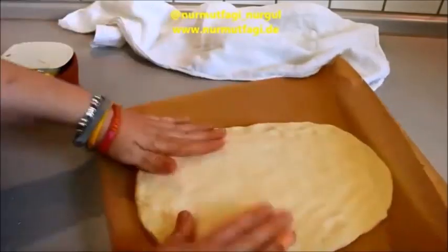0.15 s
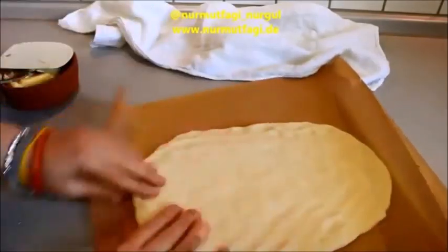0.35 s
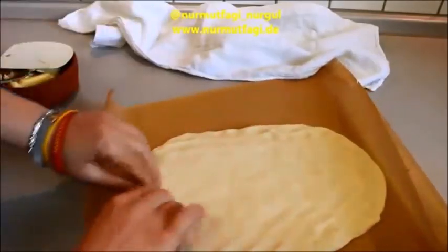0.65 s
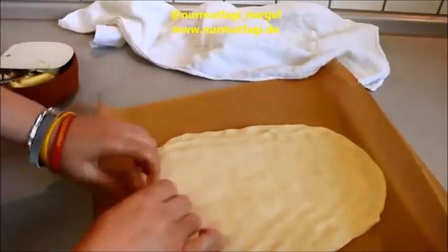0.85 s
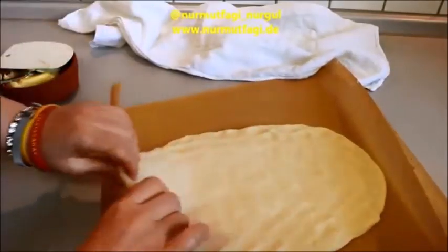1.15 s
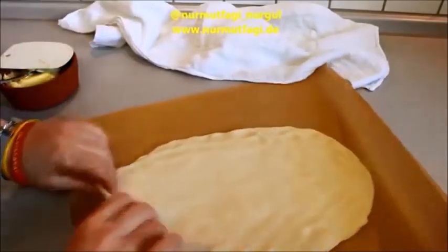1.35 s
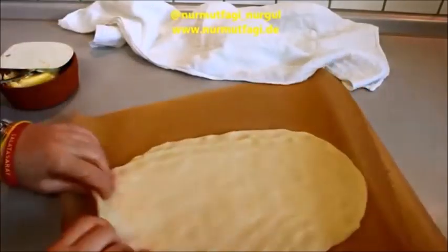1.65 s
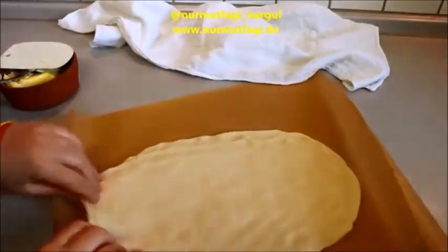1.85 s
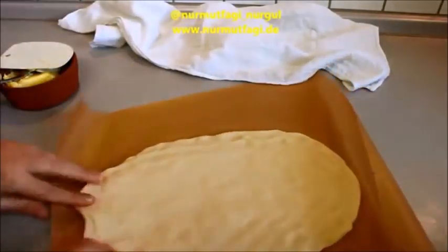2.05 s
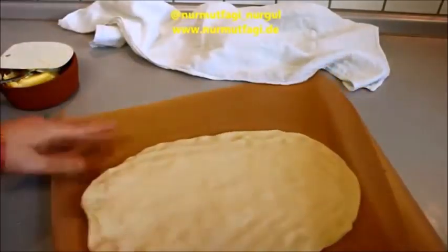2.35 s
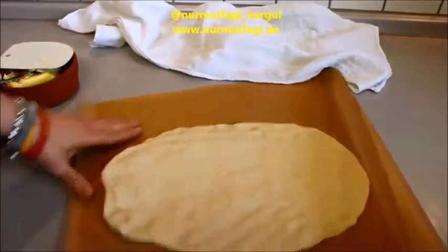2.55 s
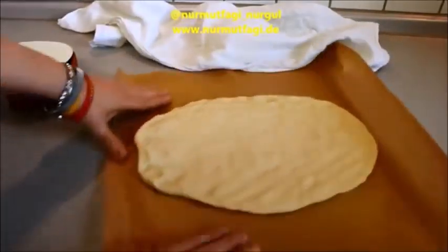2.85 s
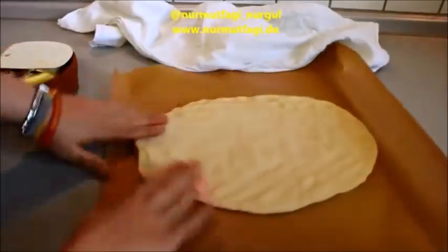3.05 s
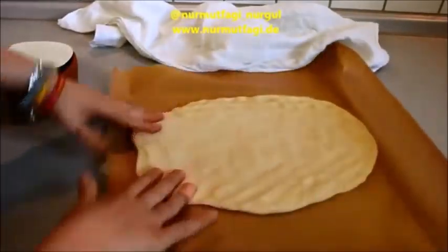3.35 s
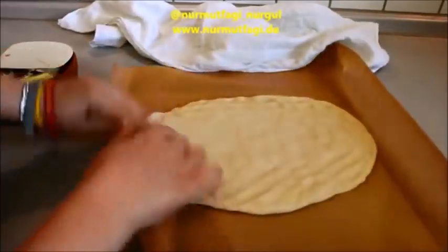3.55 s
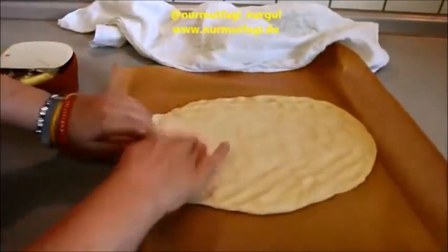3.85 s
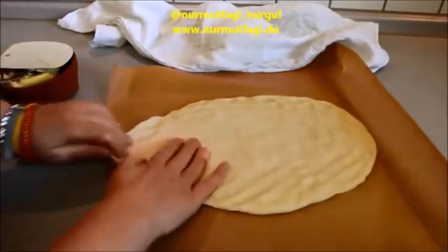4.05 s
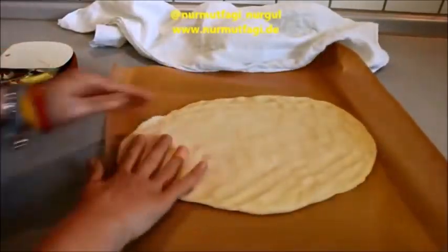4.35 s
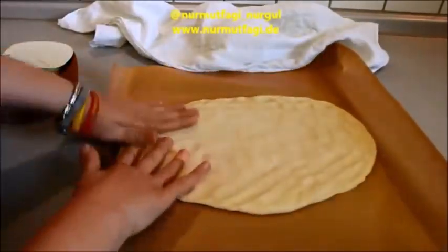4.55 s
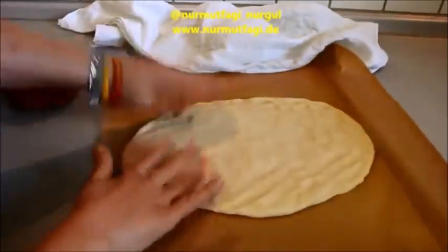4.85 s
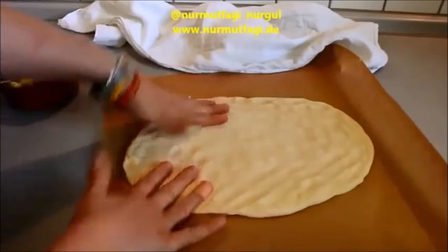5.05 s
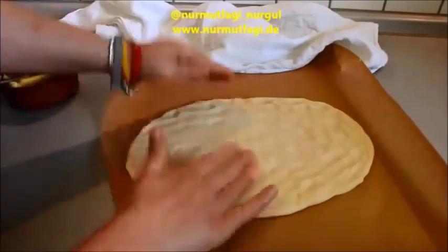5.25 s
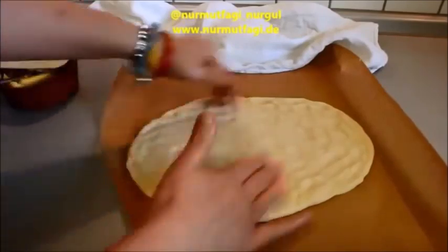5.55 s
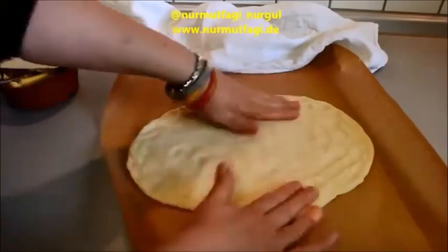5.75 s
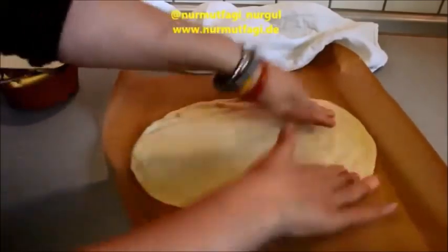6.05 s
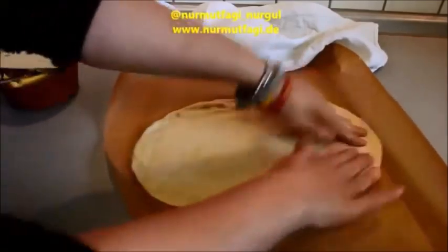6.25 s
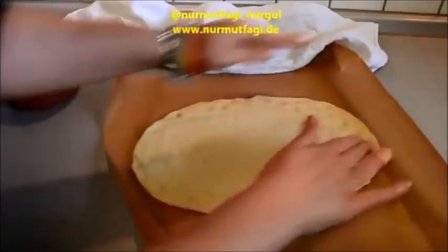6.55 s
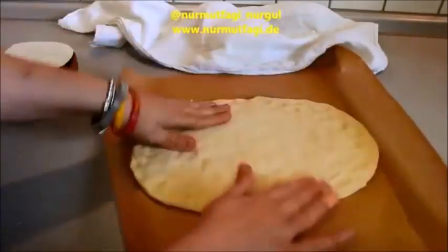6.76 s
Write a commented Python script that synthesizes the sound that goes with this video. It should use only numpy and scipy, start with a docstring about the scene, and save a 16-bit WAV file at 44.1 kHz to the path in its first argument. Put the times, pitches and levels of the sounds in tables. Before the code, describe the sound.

Baking paper crackles, slides and ticks on a kitchen counter while palms softly pat dough, with a low hum at the start.

```python
"""A kitchen counter in a small room: hands shape soft dough on baking paper.
Hiss with fibre catches makes the paper slide; bursts of coloured noise make its creases snap and its edge flap;
decaying tones make its ticks, a nudged tin and a bracelet. Palms pat the dough: an air pop, a slap, a counter thud.
Early on a low hum runs, the level dips for an instant, and low noise buffets the left microphone port."""
import sys
import numpy as np
from scipy import signal
from scipy.fft import rfft, irfft, next_fast_len
from scipy.io import wavfile
from scipy.ndimage import uniform_filter1d

SR = 44100
rng = np.random.default_rng(int(sys.argv[2]) if len(sys.argv) > 2 else 0)


def master(y):
    """Save y as 16-bit WAV."""
    cut = np.clip(np.atleast_2d(y).T, -1, 1)
    pcm = np.round(cut * 32767)  # scale
    wavfile.write(sys.argv[1], SR, pcm.astype(np.int16))


N = 304731  # length in samples

# colour of the sliding sheet: (frequency [Hz], relative density [dB per Hz])
PAPER_COLOUR = [(50, -11), (210, -11.5), (320, -3), (430, -7), (680, -7), (1000, -4.5), (1300, -2),
                (1750, 2), (3000, 4.5), (5000, 3), (8000, -3), (11000, -9.5), (15000, -21)]


def sliding(surge_db=1.0, stutter_rms_db=1.2, catches_per_s=420, catch_life_s=0.0012):
    """Friction hiss and small uneven fibre catches, coloured by the sheet; the grip surges and slackens."""
    rub, hiss, crisp = friction()
    catch_size = amp(3.0 * np.minimum(rng.exponential(size=N), 3))
    catches = (rng.random(N) < catches_per_s / SR) * catch_size
    catch_gain = signal.lfilter([1], [1, -np.exp(-1 / (catch_life_s * SR))], catches)
    scrapes = catch_gain * noise(N)  # each catch scrapes briefly
    grains = unit(kitchen(scrapes, wet_db=4.5)[:, :N])
    sheet = coloured(noise(N) + amp(0.5) * grains, PAPER_COLOUR)
    body, middle, treble = registers(sheet)

    grip_colour = [(8, -61), (18, 36), (45, -21), (150, -57), (400, -120)]
    grip_db = surge_db * coloured(rng.standard_normal(N), grip_colour)
    stutter_colour = [(8, -40), (20, 0), (70, -3), (160, -40), (400, -120)]
    stutter_db = stutter_rms_db * coloured(rng.standard_normal((3, N)), stutter_colour)
    low, mid, high = amp(grip_db + stutter_db)  # each register sticks and slips on its own
    return low * rub * body + mid * hiss * middle + high * crisp * treble


# the sheet is dragged round on the counter:
# (time [s], relative level [dB], crisp treble re level [dB], low rub re level [dB])
DRAG_MOVE = [(2.388, -86, 10, -9), (2.419, -56.5, 5.5, -15), (2.485, -56.5, -1, -10), (2.499, -44, -1, -12),
             (2.56, -39, -2.5, -2), (2.67, -43, -3.5, -12), (2.82, -48.5, 4, -14),
             (2.92, -45.5, 1.5, -10.5), (3.04, -60.5, -6.5, -8)]
DRAG_END_DB_PER_S = 164  # how fast its hiss fades outside the move
# fingers stroke and tug the paper:
# (start [s], length [s], relative level [dB], crisp treble re level [dB], low rub re level [dB])
PAPER_STROKES = [(.025, 0.034, -42.5, -3.5, -7), (.145, 0.013, -46.5, -9, -13),
                 (.168, 0.034, -39, -7.5, -11.5), (.225, 0.068, -45.5, -29, -7),
                 (.4, 0.057, -53.5, -9, -2.5), (.478, 0.087, -52.5, -19, -11), (.665, 0.042, -57, -9, -4),
                 (.745, 0.096, -52.5, -7.5, -9.5), (.972, 0.0087, -52.5, -4, -0.5),
                 (1.08, 0.014, -51, -7, -1.5), (1.255, 0.019, -59, -8.5, 1),
                 (1.325, 0.14, -43.5, -6, -10.5), (1.63, 0.14, -52, -4, -7), (1.87, 0.099, -51.5, -9, -14),
                 (2.01, 0.11, -51.5, -2.5, -9), (2.11, 0.12, -49, -3.5, -3.5),
                 (3.05, 0.05, -50.5, -7.5, -10), (3.14, 0.11, -55.5, 3.5, -6),
                 (3.455, 0.081, -50, -10, -8.5), (3.683, 0.047, -52.5, -4, -10),
                 (3.96, 0.11, -56, -6.5, -11), (4.335, 0.04, -66, 4, -1), (4.565, 0.02, -65, 4.5, -4),
                 (4.62, 0.0055, -50, -6, -11), (4.7, 0.11, -61.5, 0, -13), (4.802, 0.013, -47, -17, -12),
                 (4.814, 0.012, -41.5, -11, -15), (5.006, 0.063, -49.5, 1.5, -6.5),
                 (5.14, 0.12, -57, -8, -10.5), (5.41, 0.021, -51, -5, -14), (5.54, 0.087, -56.5, -5, -8.5),
                 (5.636, 0.0034, -49, -4, -7.5), (5.682, 0.0045, -47, -4.5, -12.5),
                 (5.795, 0.063, -65, 1, 0.5), (5.93, 0.046, -59, -7, -5), (6.105, 0.037, -61, -0.5, -7),
                 (6.28, 0.074, -67.5, 5, -9), (6.79, 0.037, -53, -8, -16)]
# a landed palm slips: (length [s], level re its slap [dB], crisp treble re level [dB], low rub re level [dB])
PALM_SLIP = (0.08, -15.5, -3.5, -2)


def friction():
    """Gains of low rub, middle and crisp treble: drag, strokes and slipping palms add in power."""
    now, t = np.arange(N) / SR, np.arange(SR) / SR
    level_db, crisp_db, rub_db = curves(DRAG_MOVE)
    outside_s = np.abs(now - np.clip(now, DRAG_MOVE[0][0], DRAG_MOVE[-1][0]))
    register_db = np.array([rub_db, np.zeros(N), crisp_db])
    power = amp(level_db - DRAG_END_DB_PER_S * outside_s + register_db) ** 2
    slip_s, slip_db, *slip_colour = PALM_SLIP
    slips = [(s, slip_s, skin_db + slip_db, *slip_colour) for s, _, _, skin_db, _ in DOUGH_PATS]
    for s, length, db, crisp, rub in list(PAPER_STROKES) + slips:
        gain = amp(db + np.array([[rub], [0], [crisp]])) * stroke(t, length)
        add(power, s, gain ** 2)
    return np.sqrt(power)


GRAB_S, SWELL_DB, STOP_DB_PER_S = 0.0009, 7.5, 206  # a stroke takes hold, gathers speed, then stops
RELAX_DB, RELAX_DB_PER_S = -13, 37.5  # the sheet goes on relaxing after it


def stroke(t, length):
    """Gain of one stroke: it takes hold, swells as the hand speeds up, stops, and the sheet relaxes."""
    after = np.maximum(t - length, 0)
    swell = amp(-SWELL_DB * np.maximum(1 - t / length, 0))
    release = np.hypot(amp(-STOP_DB_PER_S * after), amp(RELAX_DB - RELAX_DB_PER_S * after))
    return (1 - np.exp(-t / GRAB_S)) * swell * release


# creases giving way in a short run of cracks:
# (time [s], relative level [dB], centre [Hz], relative treble [dB], t60 [s])
CREASE_SNAPS = [(0.03, -35, 2670, -22, 0.056), (0.1742, -29, 5040, 5.5, 0.031),
                (.201, -29.5, 2820, -20, 0.025), (0.242, -30.5, 2800, -24, 0.018),
                (0.2955, -31, 2470, -4, 0.025), (.404, -39, 2900, -37, 0.019),
                (0.4408, -32, 2750, -3, 0.045), (.667, -37, 2760, -9, 0.042), (.772, -36, 3250, -28, 0.026),
                (.839, -35, 2580, -7, 0.027), (0.976, -39, 2360, -17, 0.03),
                (2.129, -38.5, 3000, -14, 0.035), (2.181, -33, 4100, -3, 0.056),
                (2.493, -34, 5100, 5, 0.018), (2.529, -30, 3200, -3, 0.066),
                (2.5722, -25.5, 2780, -3, 0.032), (2.7046, -21, 3480, -5.5, 0.042),
                (2.8865, -30.5, 2420, -15, 0.051), (3.0933, -34, 2450, -26, 0.017),
                (3.402, -44, 2500, -6, 0.015), (3.5132, -33, 2560, -7, 0.025),
                (3.7231, -39.5, 2820, -9, 0.017), (4.6233, -38.5, 2010, 3, 0.021),
                (4.832, -28.5, 3380, -9.5, 0.062), (5.0617, -27.5, 3540, -14, 0.033),
                (5.229, -42, 2680, -17, 0.034), (5.353, -38.5, 2640, -4.5, 0.049),
                (5.4077, -27.5, 2720, -8, 0.023), (5.4635, -34, 3740, -22, 0.035),
                (5.6421, -35.5, 2170, -1, 0.058)]
# colour of a crease at the usual pitch: (frequency [Hz], relative density [dB per Hz])
CREASE_COLOUR = [(40, -32), (400, -14.5), (1000, -2.5), (1700, 4), (3000, 10.5), (4500, 6.5), (7000, 1),
                 (10000, -18), (15000, -36)]


def snaps(usual_hz=3100, gain_db=-6.0, treble_db=-3, rise_share=0.08, give_db=3, give_s=0.000083):
    """A crease strains, then gives in a ragged burst with one sharp peak, pitched by its own centre."""
    out, t = np.zeros((2, N)), np.arange(SR // 8) / SR
    for s, db, hz, crisp_db, t60 in CREASE_SNAPS:
        fold = coloured(noise(len(t)), np.array(CREASE_COLOUR) * [hz / usual_hz, 1])
        fizz = registers(coloured(noise(len(t)), PAPER_COLOUR))[-1]
        rise = rise_share * t60  # long creases start more gently
        give = amp(give_db * np.exp(-((t - 2 * rise) / give_s) ** 2))
        texture = fold + amp(crisp_db + treble_db) * fizz
        crack = amp(db + gain_db) * give * burst(t, t60, rise) * texture
        add(out, s, diffuse(crack, wet_db=-3, build=0.002))
    return out


# the stiff sheet buckles with one dry tick: (time [s], relative level [dB], pitch [Hz])
BUCKLE_TICKS = [(0.1749, -12.5, 6000), (0.274, -34, 4500), (.3205, -46, 3500), (.449, -33.5, 3500),
                (0.8222, -39, 3300), (.842, -28.5, 3000), (.987, -33, 3500), (1.359, -30, 4500),
                (1.748, -44, 5000), (1.783, -25, 6000), (1.9593, -36.5, 2640), (2.1812, -32, 4000),
                (2.236, -38, 3700), (2.5742, -23, 2820), (2.67, -27, 2200), (2.7073, -27, 3300),
                (2.9303, -19.5, 3560), (3.075, -34, 2986), (3.095, -34, 2800), (3.259, -32, 3500),
                (3.535, -34, 3980), (3.702, -46, 5000), (5.0547, -40, 8000), (5.166, -38, 3000),
                (5.69, -33, 2980), (5.963, -51.5, 3000), (6.3535, -36.5, 3000), (6.5094, -38, 2400)]


def ticks(life_cycles=1.0, rebound_db=-7, rebound_s=0.0019, wet_db=0):
    """A buckle flips within a cycle or two, then rebounds once at its own delay and pitch."""
    out, t = np.zeros((2, N)), np.arange(SR // 50) / SR

    def flip(u, hz):
        return np.sin(2 * np.pi * hz * u) * np.exp(-hz * u / life_cycles)

    rebounds = rng.random((len(BUCKLE_TICKS), 2)) + 0.5
    for (s, db, hz), (lag, size) in zip(BUCKLE_TICKS, rebounds):
        rebound = flip(np.maximum(t - rebound_s * lag, 0), hz * size)
        crack = flip(t, hz) + amp(rebound_db) * rebound
        add(out, s, kitchen(amp(db) * crack, wet_db))
    return out


# the paper's edge flaps on the counter: (time [s], relative level [dB], t60 [s])
EDGE_FLAP = (.4752, -26, 0.064)
# its colour: (frequency [Hz], relative density [dB per Hz])
EDGE_COLOUR = [(50, -54), (300, -4.5), (550, -2.5), (1000, 1), (1300, -5.5), (1700, 3.5), (2400, -2),
               (3600, -5), (5500, -13.5), (12000, -32)]


def flap():
    """The whole edge of the sheet slaps down, a burst of coloured noise that wakes the room."""
    out, t = np.zeros((2, N)), np.arange(SR // 4) / SR
    s, db, t60 = EDGE_FLAP
    slap = amp(db) * burst(t, t60, rise=0.00085) * coloured(noise(len(t)), EDGE_COLOUR)
    add(out, s, diffuse(slap, wet_db=0.5, build=0.012))
    return out


def near_walls(x, echo_db=-21, count=7):
    """The counter and tiles throw back weak early copies that comb the sound."""
    delays = (rng.uniform(0.0017, 0.018, count) * SR).astype(int)
    return x + amp(echo_db) * sum(np.pad(x, ((0, 0), (d, 0)))[:, :N] for d in delays)


# palms and fingers landing on the dough, levels relative:
# (time [s], air pop [dB], pop pitch [Hz], skin slap [dB], thud [dB])
DOUGH_PATS = [(.034, -42.5, 770, -44, -50.5), (2.424, -53, 337, -59, -83), (2.466, -54, 312, -71, -75),
              (2.495, -47, 504, -50, -56), (2.537, -58, 617, -49, -52.5), (2.708, -60, 328, -67, -85),
              (3.253, -51.5, 527, -58, -54), (3.615, -60.5, 515, -65, -76), (3.993, -58, 620, -57.5, -63.5),
              (4.247, -59, 620, -62, -74), (4.395, -59, 650, -56, -57.5), (4.562, -53.5, 580, -58.5, -54),
              (5.008, -46, 606, -54, -58), (5.018, -40, 606, -50.5, -58), (5.295, -58.5, 640, -57, -76),
              (5.3595, -35.5, 590, -47, -70), (5.421, -48, 755, -42, -45), (5.766, -41, 538, -50, -51.5),
              (6.058, -38.5, 536, -46, -63), (6.087, -44.5, 880, -49, -53.5),
              (6.305, -49.5, 677, -52.5, -57.5), (6.339, -43.5, 580, -48, -49.5),
              (6.496, -63, 685, -58.5, -61), (6.722, -61, 543, -57.5, -89), (6.76, -45.5, 530, -53, -56),
              (6.797, -59, 664, -56, -52)]
# colour of a slap: (frequency [Hz], relative density [dB per Hz])
SKIN_COLOUR = [(40, -30), (170, -15), (350, -5.5), (900, -4.5), (2400, -8.5), (5000, -15.5), (12000, -28.5)]
# modes of the counter under the dough: (nominal frequency [Hz], relative level [dB], t60 [s])
COUNTER_MODES = [(64.4, -1, 0.4), (94.6, 0.5, 0.27), (159, -17, 0.43), (230, -16, 0.042),
                 (328.4, -14, 0.17), (380, -13, 0.03)]
SAG_SHARE, SAG_S = 0.075, 0.034  # the counter's pitch starts high and sinks as the hand's weight settles


def pats(swell=0.002, soft=0.0032, pop_db=1.5, thud_db=4,
         finger_lag=0.036, finger_db=-13, finger_octaves=2.3, lowest_hz=40):
    """Skin slaps, air squeezed from under palm and fingers pops, and the soft push rings the counter."""
    out, thuds = np.zeros((2, N)), np.zeros((1, N))
    brief, t = np.arange(SR // 10) / SR, np.arange(SR // 2) / SR
    sagging = t + SAG_SHARE * SAG_S * (1 - np.exp(-t / SAG_S))

    def puff(u, hz):
        return u / swell * np.exp(1 - u / swell) * np.sin(2 * np.pi * hz * u)

    for s, air_db, hz, skin_db, push_db in DOUGH_PATS:
        fingers = 0
        for lag, size in rng.random(size=(4, 2)):
            finger_hz = hz * 2 ** (finger_octaves * (size - 0.5))
            fingers = fingers + puff(np.maximum(brief - finger_lag * lag, 0), finger_hz)
        pop = amp(air_db + pop_db) * (puff(brief, hz) + amp(finger_db) * fingers)
        skin = coloured(noise(len(brief)), SKIN_COLOUR)
        slap = amp(skin_db) * burst(brief, t60=0.069, rise=0.0018) * skin
        add(out, s, kitchen(pop + slap, wet_db=-3))

        ring = 0
        for f, db, t60 in COUNTER_MODES:
            # the weight of the hand shifts each mode a little
            gain = amp(db + rng.normal(0, 1) - 60 * t / t60)
            cycles = f * rng.normal(1, 0.0427) * sagging + rng.random()
            ring = ring + gain * np.sin(2 * np.pi * cycles)
        add(thuds, s, amp(push_db + thud_db) * ring * (1 - np.exp(-t / soft)))
    highpass = signal.butter(2, lowest_hz, "highpass", fs=SR, output="sos")
    return out + signal.sosfilt(highpass, thuds)


# modes of something hollow, perhaps a tin: (frequency [Hz], relative level [dB], t60 [s])
TIN_MODES = [(936, -40.5, .26), (1056, -39, 0.19), (2520, -38.5, 0.25), (3020, -40, 0.33)]


def tin():
    """Something hollow on the counter is nudged by the drag and rings."""
    return rung(2.571, TIN_MODES, wet_db=-8)


# modes of two bracelet beads: (frequency [Hz], relative level [dB], t60 [s])
BEAD_MODES = [(1750, -53.5, 0.054), (1994, -47, .035), (2480, -47, 0.014)]


def bracelet():
    """Two beads of a bracelet click together and ring briefly."""
    return rung(4.1775, BEAD_MODES, wet_db=-0.5)


def rung(s, modes, wet_db):
    """A small hard thing is touched once and rings with its modes."""
    out, t = np.zeros((2, N)), np.arange(SR // 2) / SR
    ring = sum(amp(db - 60 * t / t60) * np.sin(2 * np.pi * hz * t) for hz, db, t60 in modes)
    add(out, s, kitchen(ring, wet_db))
    return out


# buffeting at the left port: (time [s], level [dB])
PORT_LEVEL = [(1.25, -51), (1.265, -44.5), (1.38, -41), (1.415, -49), (1.437, -31), (1.46, -38),
              (1.49, -42.5), (1.58, -38.5), (1.7, -43), (1.79, -42.5), (1.815, -90)]
# its colour: (frequency [Hz], relative density [dB per Hz])
BUFFET_COLOUR = [(12, -7), (25, 0.5), (45, -8), (100, -12), (200, -21), (350, -26), (700, -34.5),
                 (2000, -77)]


def buffeting(right_db=-19, lump_db=3.0):
    """Low, uneven lumps of noise, almost all on the left port, from the start of the dip on."""
    level_db, = curves(PORT_LEVEL)
    lump_colour = [(18, -2), (60, -58), (200, -120)]
    lumps = amp(lump_db * coloured(rng.standard_normal(N), lump_colour))
    rumble = unit(lumps * coloured(rng.standard_normal((2, N)), BUFFET_COLOUR))
    return amp(level_db) * rumble * amp([[0], [right_db]]) * (np.arange(N) / SR > DIP[0])


# tones of an appliance: (frequency [Hz], rms level [dB])
HUM_TONES = [(86, -67), (328, -71), (484, -71)]
# colour of its rumble: (frequency [Hz], relative density [dB per Hz])
RUMBLE_COLOUR = [(20, -24), (40, 7.5), (90, 4.5), (170, -11), (320, -5), (500, -9.5), (1000, -15),
                 (4000, -24)]
# colour of the room air: (frequency [Hz], relative density [dB per Hz])
AIR_COLOUR = [(25, -3), (90, 3), (250, -8.5), (500, -2.5), (1500, -6), (2300, -6.5), (7000, -13.5),
              (15000, -18.5)]


def background(air_db=-69, drone_db=-60, drift_rad=0.69):
    """Faint room air throughout; an appliance drones with wandering phase until the dip."""
    t = np.arange(N) / SR
    hum = 0
    for hz, db in HUM_TONES:
        wander = drift_rad * coloured(rng.standard_normal(N), [(8, 2), (40, -60), (100, -120)])
        hum = hum + amp(db) * np.sqrt(2) * np.sin(2 * np.pi * hz * t + wander)
    drone = hum + amp(drone_db) * coloured(noise(N), RUMBLE_COLOUR)
    return amp(air_db) * coloured(noise(N), AIR_COLOUR) + drone * (t < DIP[0])


# how fast the room dies away: (frequency [Hz], t60 [s])
KITCHEN_T60 = [(100, 0.14), (600, 0.32), (2500, 0.39), (6000, 0.39), (14000, 0.45)]


def tail(build):
    """A fresh answer from tiles and cupboards, each frequency dying at its own speed."""
    hz, t, z = signal.stft(noise(SR // 3), SR, nperseg=256)
    decay = amp(-60 * t / along(KITCHEN_T60, hz)[:, None])
    wash = signal.istft(z * decay * (1 - np.exp(-t / build)), SR, nperseg=256)[1]
    return wash / np.linalg.norm(wash[0])


def kitchen(x, wet_db, build=0.00047):
    """A sound plus the room's answer, by convolution."""
    answer = amp(wet_db) * tail(build)
    answer[:, 0] += 1  # the direct sound
    return signal.fftconvolve(np.atleast_2d(x), answer, axes=1)


def diffuse(x, wet_db, build):
    """A wide sheet reaches the room by many paths: the tail takes only the sound's broad colour."""
    power = np.mean(np.abs(rfft(x, SR // 2)) ** 2, axis=0)
    colour = np.sqrt(np.abs(uniform_filter1d(power, size=250)))
    out = amp(wet_db) * irfft(rfft(tail(build), SR // 2) * colour, SR // 2)[:, :SR // 3]
    add(out, 0, x)
    return out


def burst(t, t60, rise):
    """Envelope of a ragged run of cracks that dies away; its loudest 4 ms has rms 1."""
    ragged = amp(2 * unit(uniform_filter1d(rng.standard_normal(len(t)), size=70)))
    shape = ragged * (1 - np.exp(-t / rise)) * amp(-60 * t / t60)
    return shape / np.sqrt(uniform_filter1d(shape ** 2, size=176).max())


# stereo width: (frequency [Hz], left-right likeness [0 to 1])
LIKENESS = [(60, 0), (280, 0.6), (600, 0.74), (1200, 0.81), (2500, 0.76), (5000, 0.58), (9000, 0.46),
            (14000, 0)]


def spread(pair):
    """Two unrelated signals become left and right: most alike in the middle, apart at both extremes."""
    def mix(hz):
        turn = np.arccos(np.clip(along(LIKENESS, hz), -1, 1)) / 2
        return np.array([np.cos(turn), np.sin(turn)])

    mid, side = filtered(pair, mix)
    return np.array([mid + side, mid - side])


def noise(size):
    """White noise spread in stereo."""
    return spread(rng.standard_normal((2, size)))


def registers(x, low_hz=1150, high_hz=5800):
    """Body, middle and treble of x, each at rms 1."""
    def below(hz, edge):
        return 1 / (1 + (hz / edge) ** 4)

    body = filtered(x, lambda hz: below(hz, low_hz))
    middle = filtered(x, lambda hz: below(hz, high_hz) - below(hz, low_hz))
    treble = filtered(x, lambda hz: 1 - below(hz, high_hz))
    return [unit(body), unit(middle), unit(treble)]


def coloured(x, spectrum):
    """x with a (frequency [Hz], level [dB]) colour, at rms 1."""
    return unit(filtered(x, lambda hz: amp(along(spectrum, hz))))


def filtered(x, response):
    """x times a response of frequency."""
    n = x.shape[-1]
    m = next_fast_len(n + 8192)
    return irfft(rfft(x, m) * response(np.fft.rfftfreq(m, 1 / SR)), m)[..., :n]


def along(points, hz):
    """Interpolate (frequency [Hz], value) points on a log frequency axis."""
    f, v = np.transpose(points)
    return np.interp(np.log(hz + 1), np.log(f + 1), v)


def curves(rows):
    """One value per sample for each column after the time."""
    s, *cols = np.transpose(rows)
    return [np.interp(np.arange(N) / SR, s, c) for c in cols]


def amp(db):
    """Decibels to gain."""
    return 10 ** (np.asarray(db) / 20)


def unit(x):
    """Scale to rms 1."""
    return x / np.sqrt(np.mean(x ** 2) + 1e-20)


def add(track, s, sound):
    """Mix a sound into the track at time s."""
    part = track[:, max(0, round(s * SR)):][:, :sound.shape[-1]]
    part += sound[..., :part.shape[1]]


def scene():
    """Paper, dough and small objects, a little louder on the right, over the background."""
    paper = near_walls(sliding() + snaps() + ticks() + flap())
    work = paper + pats() + tin() + bracelet()
    return work * side_gains() + buffeting() + background()


def side_gains():
    """Gain of the work on each side: both positive, the right about 1.4 dB louder than the left."""
    return amp([[-0.7], [0.7]])


# the brief dip in level: (start [s], end [s])
DIP = (1.228, 1.259)


def record(dry):
    """The level dips by up to 25 dB for an instant; nothing is kept from 15250 Hz up."""
    t = np.arange(N) / SR
    outside_dip = (t < DIP[0]) | (t > DIP[1])
    live = uniform_filter1d(1.0 * outside_dip, size=130)  # soft edges
    return filtered(dry * np.maximum(live, amp(-25.0)), lambda hz: hz < 15250)


dry = scene()
out = record(dry)
master(out)
```